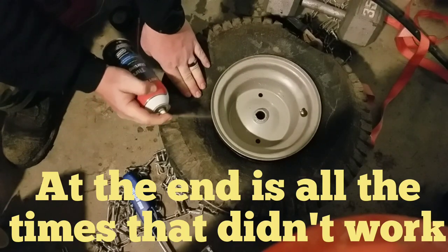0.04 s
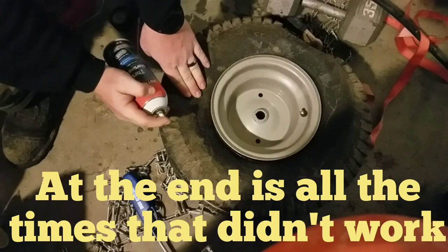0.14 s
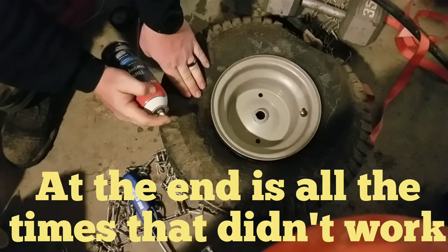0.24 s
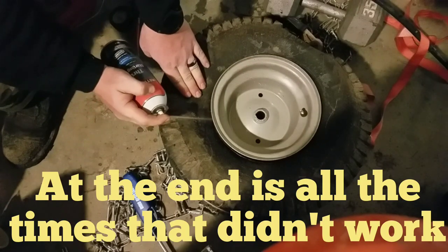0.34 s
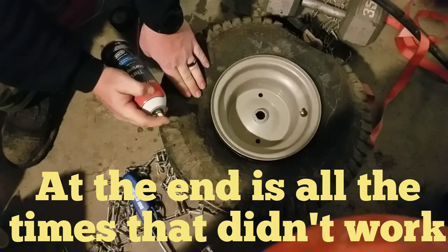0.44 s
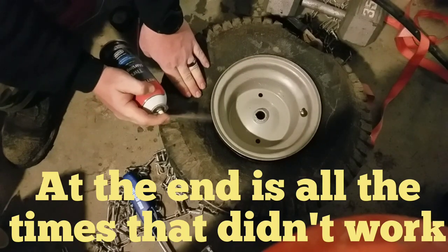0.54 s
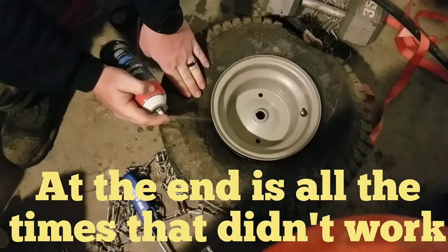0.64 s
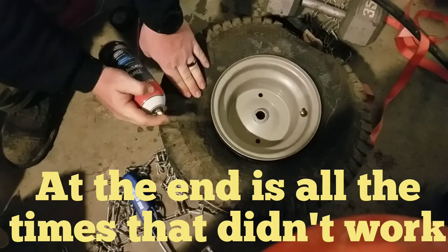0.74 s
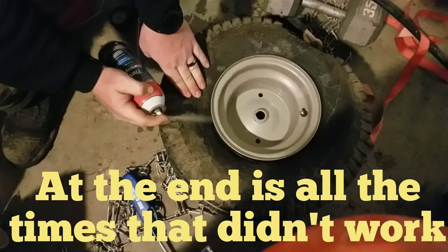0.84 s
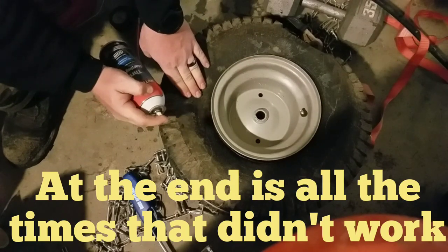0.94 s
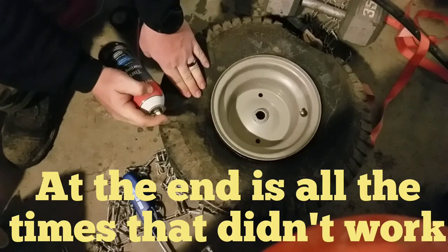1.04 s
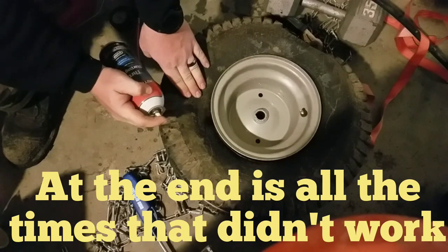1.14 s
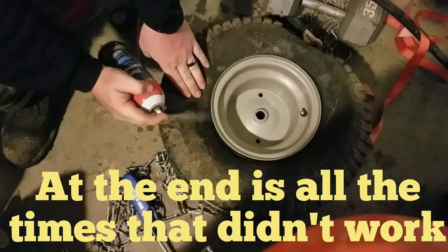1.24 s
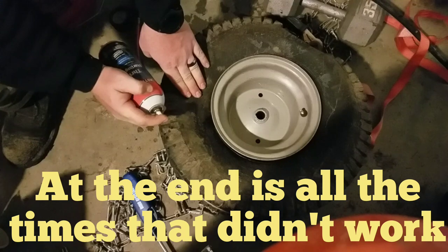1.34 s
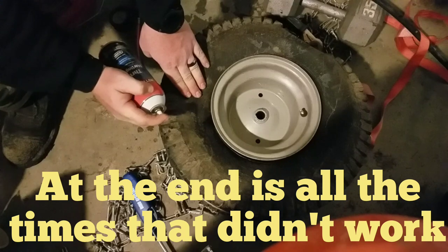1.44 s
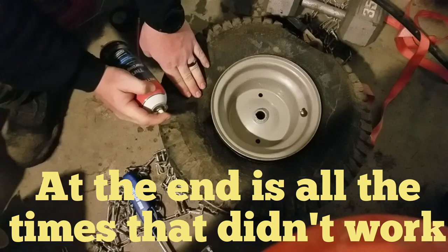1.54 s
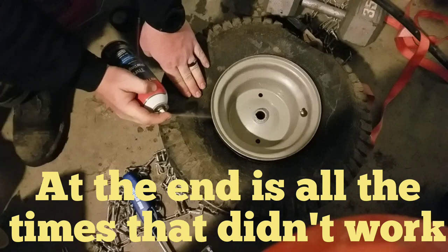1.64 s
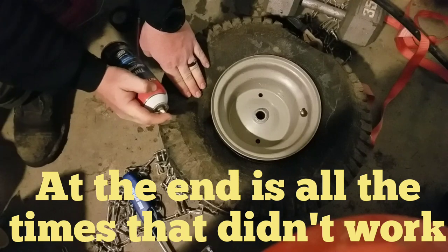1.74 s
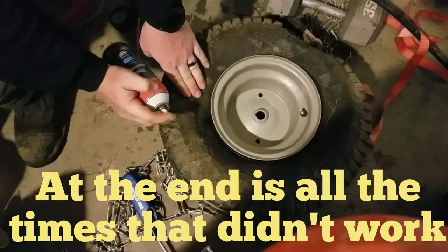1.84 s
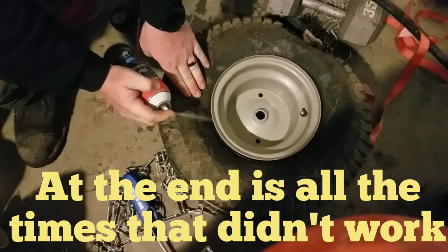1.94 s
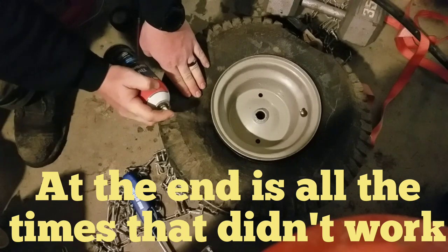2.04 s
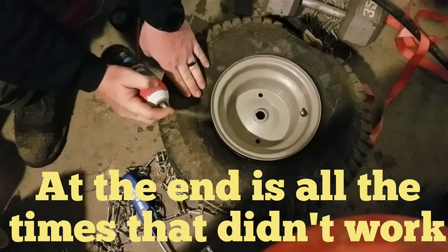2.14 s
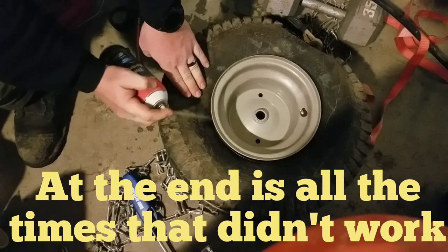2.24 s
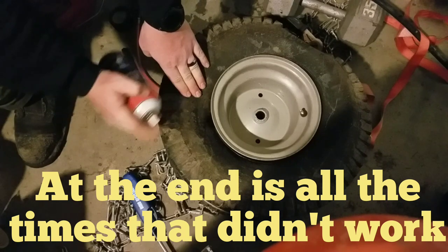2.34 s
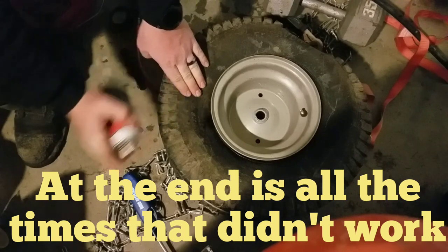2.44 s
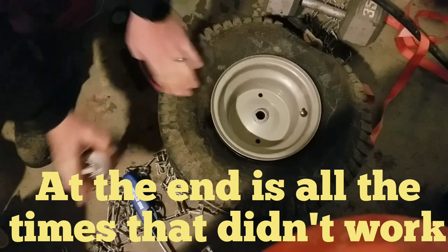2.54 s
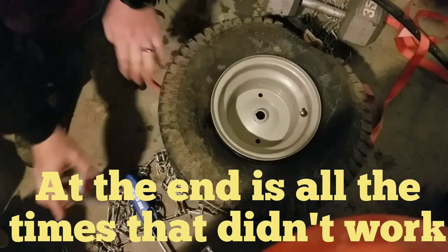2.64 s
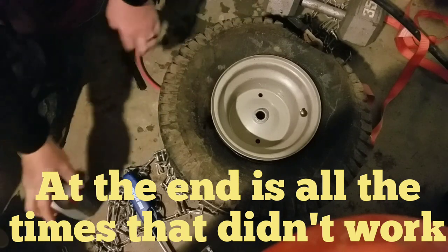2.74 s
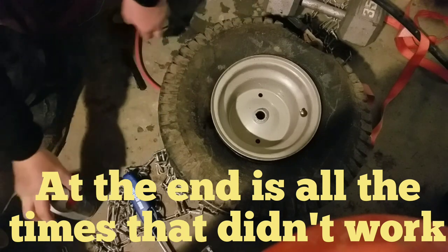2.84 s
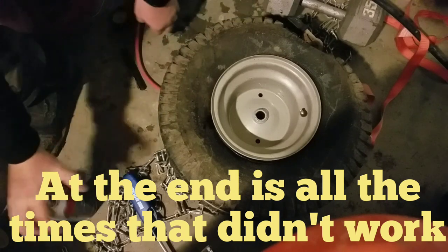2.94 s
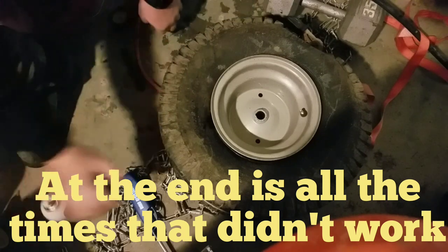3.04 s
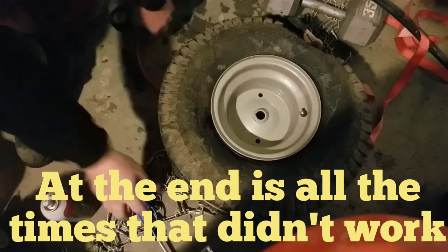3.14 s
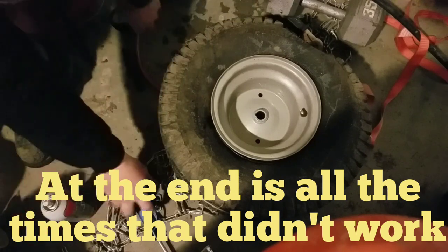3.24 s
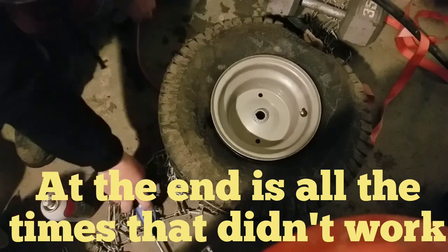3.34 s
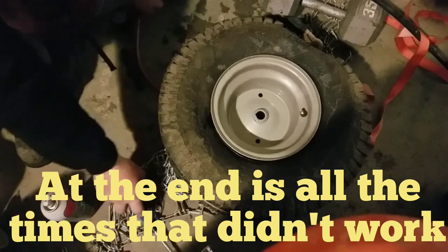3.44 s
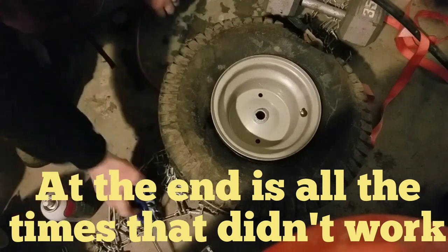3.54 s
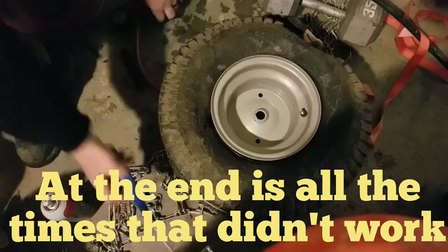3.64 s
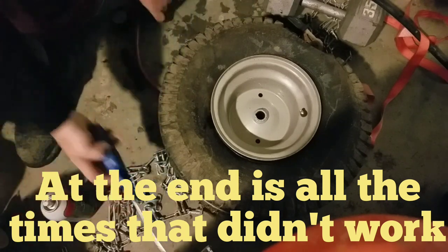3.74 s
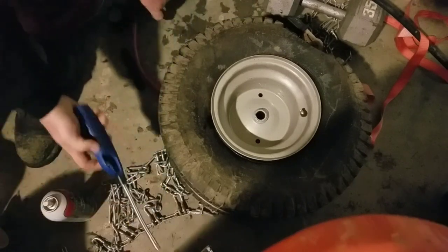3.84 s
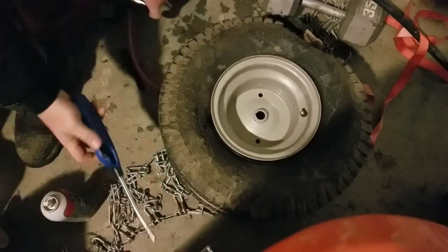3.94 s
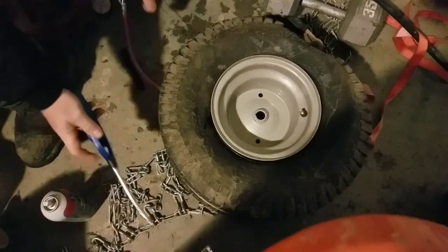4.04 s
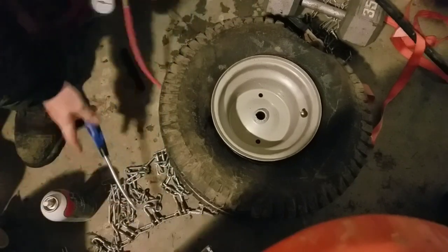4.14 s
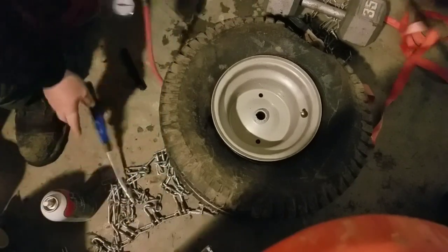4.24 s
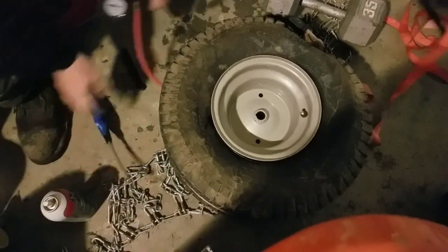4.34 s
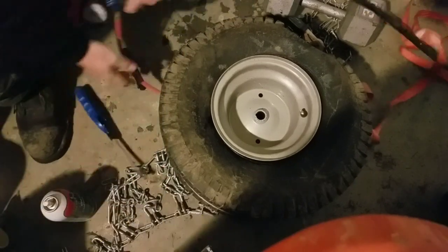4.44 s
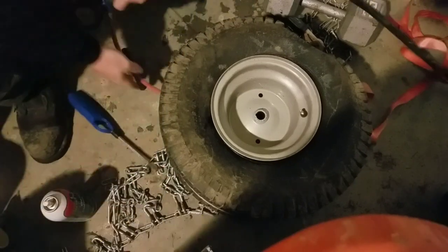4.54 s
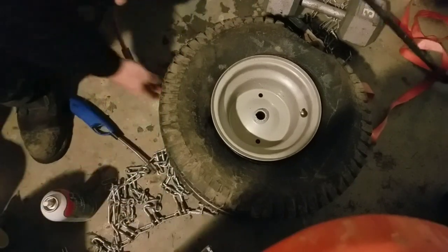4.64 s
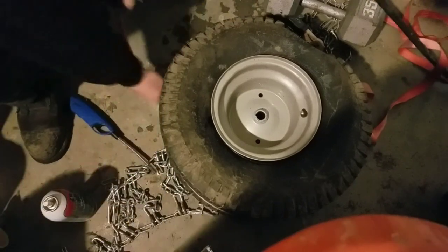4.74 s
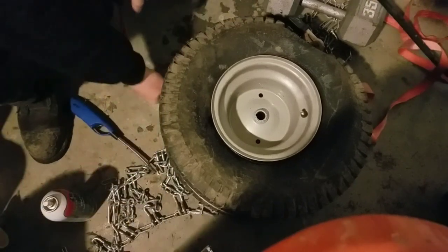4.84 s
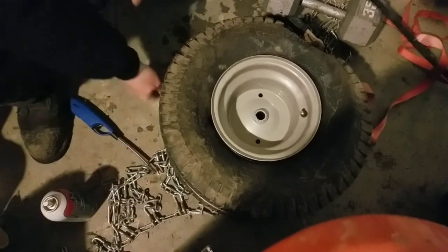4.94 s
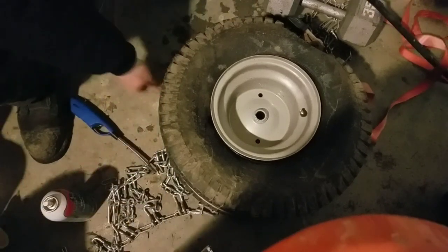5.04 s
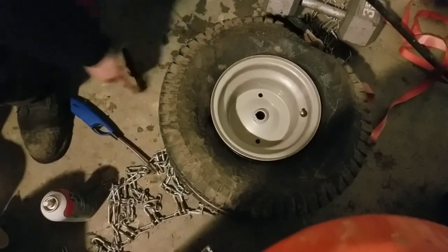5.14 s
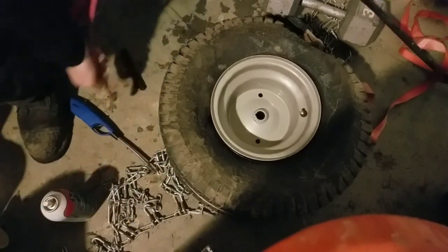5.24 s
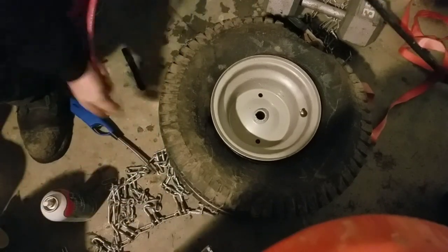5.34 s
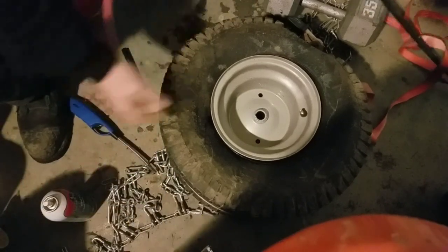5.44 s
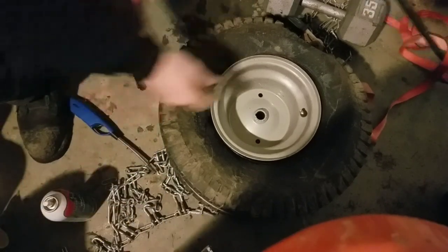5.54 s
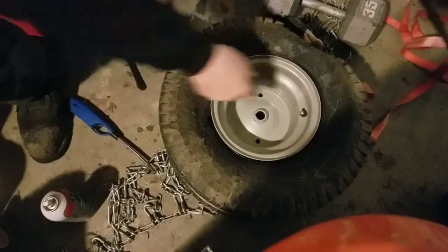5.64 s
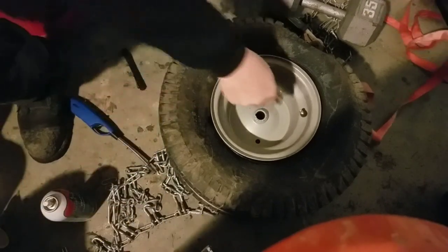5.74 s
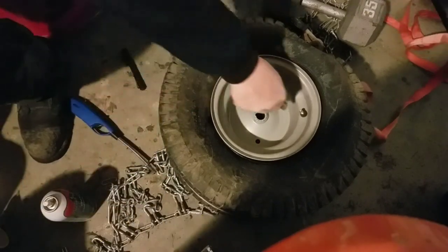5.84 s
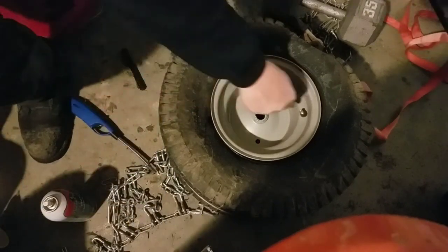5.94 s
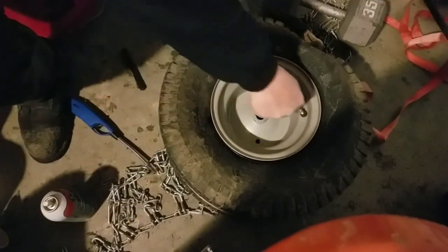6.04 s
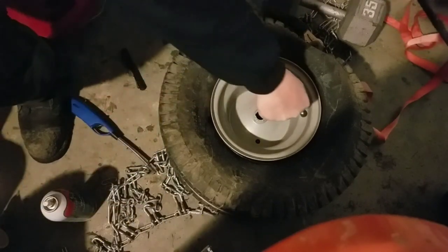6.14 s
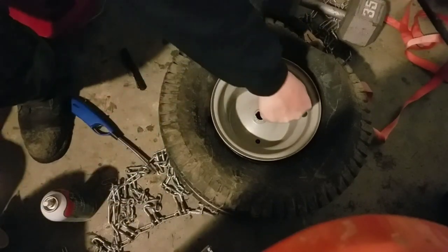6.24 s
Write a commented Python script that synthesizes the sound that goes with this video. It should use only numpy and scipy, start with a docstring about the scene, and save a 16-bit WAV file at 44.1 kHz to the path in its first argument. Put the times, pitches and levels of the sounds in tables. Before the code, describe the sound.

Nine short aerosol bursts hiss into a hollow tire, then the can bangs on concrete and hand tools clatter down in a garage.

```python
"""An aerosol can sprays nine short bursts into the gap between a tire and its rim, on a garage floor:
shaped noise for the jet, resonant noise for the hum of the hollow tire. The can is knocked down on the
concrete and rings (pushes and dying sines); a lighter is picked off a pile of chain, hand tools clatter
down (chattering blows and short modes), and an air hose is dragged over to the rim (grains, dull bumps).
Slipping plastic and rubber squeak (narrow noise); quiet garage air and a low hum lie below."""
import sys
import numpy as np
from scipy import signal
from scipy.fft import rfft, irfft
from scipy.io import wavfile
from scipy.ndimage import uniform_filter1d

SR = 44100
rng = np.random.default_rng(int(sys.argv[2]) if len(sys.argv) > 2 else 0)


def wrap_up_sound(samples):
    """Save the sound to the file named by the first command line argument, as 16-bit audio."""
    columns = np.atleast_2d(samples).T
    # keep every value between -1 and 1, then stretch to whole-number steps
    tamed = np.clip(columns, -1, 1)
    steps = np.round(tamed * 32767).astype(np.int16)
    wavfile.write(sys.argv[1], SR, steps)


N = 278050
TIME = np.arange(N) / SR  # s

# Valve presses: (start [s], length [s], jet level before hiss_db [dB], jet swell over the press [dB],
# roar level before hiss_db-free mix [dB], tire hum level [dB], hum swell over the press [dB])
PRESSES = [(0.099, 0.1491, -38.5, 1, -51.5, -58, -4), (0.411, 0.1336, -39.5, 8.5, -51.5, -50, -1),
           (0.658, 0.1273, -37.5, -2.5, -50, -44.5, -11.5), (0.887, 0.1274, -36, 0.5, -49.5, -43.5, 2),
           (1.114, 0.1294, -36, 1.5, -51, -49, 10.5), (1.338, 0.1328, -37, -5, -50, -48, 3),
           (1.578, 0.2604, -38, 4, -52.5, -48, 2.5), (2.037, 0.1402, -36.5, 3, -50, -46, 2.5),
           (2.277, 0.1326, -36, -1, -50.5, -45, -16)]
# Nozzle fizz spectrum: (frequency [Hz], relative level [dB])
FIZZ_SPECTRUM = [(150, -18.5), (1000, -20.5), (3300, -13), (5200, -17.5), (7500, -11.5), (9800, -12),
                 (10800, -4), (12000, -7.5), (14000, -0.5), (15600, 1.5)]
# Roar spectrum where the jet lands: (frequency [Hz], relative level [dB])
SPLASH_SPECTRUM = [(150, -18), (330, 0.5), (600, 1), (1000, -2.5), (1800, -3), (3300, -3.5), (6000, -12),
                   (15000, -1.5)]
# Rim gap resonances: (frequency before aim shift [Hz], width [Hz], gain [dB])
RIM_GAP_MODES = [(1416, 86, 9.5), (1701, 74, 4.5), (2642, 360, 4), (3040, 170, -12.5), (4218, 143, 3),
                 (6493, 220, 1.5)]
# Air inside the tire: (frequency [Hz], half the width of each of two cascaded resonators [Hz], gain [dB])
TIRE_MODES = [(164.46, 28.9, 4), (187.5, 34.5, -2.5)]
# Liquid spat on the rubber by the first press: (peak time [s], level [dB], rise [s], fade to -60 dB [s])
SPIT_STROKES = [(.137, -48.5, 0.026, 0.3479)]
# Spit spectrum: (frequency [Hz], relative level [dB])
SPIT_SPECTRUM = [(40, -36.5), (120, -6.5), (330, 2.5), (520, -6.5), (750, -6), (1300, -7), (2000, -4.5),
                 (4000, -34), (15000, -44.5)]
VALVE_OPEN_S, VALVE_CLOSE_S, HUM_BUILD_S = 0.007, 0.00834, 0.0107  # ramp, time constant, time constant
SPURT_DB, SPURT_S = 2.5, 0.0129  # stored pressure makes each press start harder
AIM_SHIFT = 0.0407  # each aim meets the gap elsewhere; scales the random shift of its resonances


def spray(hiss_db=3, sputter_db=1.45, roar_follow=0.88, bounce_db=-11, bounce_s=0.00271):
    """The jet starts at once and dies quickly; the air in the tire takes a moment to start humming."""
    hiss = strokes(SPIT_STROKES) * colour(rng.standard_normal(N), SPIT_SPECTRUM)
    hum_gain = np.zeros(N)
    fizz = colour(rng.standard_normal(N), FIZZ_SPECTRUM)
    turbulence = rng.standard_normal(N)
    splash = colour(turbulence, SPLASH_SPECTRUM)
    # uneven liquid in the nozzle
    unevenness = unit(uniform_filter1d(rng.standard_normal(N), size=600))
    sputter = amp(sputter_db * unevenness)
    for start, length, jet_db, swell_db, roar_db, tire_db, tire_swell_db in PRESSES:
        age = np.maximum(TIME - start, 0)
        closing = np.exp(-np.maximum(age - length, 0) / VALVE_CLOSE_S)
        valve = np.minimum(age / VALVE_OPEN_S, 1) * closing
        progress = np.minimum(age / length, 1) - 0.5
        push_db = swell_db * progress + SPURT_DB * np.exp(-age / SPURT_S)
        aim = 1 + AIM_SHIFT * rng.uniform(-1.09, 1)
        gap = sum(amp(db) * resonate(turbulence, hz * aim, width) for hz, width, db in RIM_GAP_MODES)
        roar = amp(roar_db + roar_follow * push_db) * (splash + gap)
        jet = valve * sputter * (amp(hiss_db + jet_db + push_db) * fizz + roar)
        hiss += signal.oaconvolve(jet, scatter(bounce_db, bounce_s))[:N]  # bounces off the rim
        build = 1 - np.exp(-age / HUM_BUILD_S)
        hum_gain += valve * amp(tire_db + tire_swell_db * progress) * build
    hum = unit(sum(amp(db) * resonate_twice(rng.standard_normal(N), hz, 2 * half_width)
                   for hz, half_width, db in TIRE_MODES))
    # steady blowing evens out the swells
    hum = unit(hum / np.sqrt(abs(signal.hilbert(hum)) + 0.355))
    return garage(hiss, wet_db=-8.5) + garage(hum_gain * hum, wet_db=-12.5)


# Can lands on one edge, then the other, and rocks:
# (time [s], level [dB], rasp time constant [s], treble shelf [dB], ring re level [dB])
CAN_LANDINGS = [(2.8995, 2.5, 0.00155, 7, -3), (2.9016, -2, 0.0028, 15.5, -13), (2.9121, -1, .003, 7, -6),
                (3.103, -15.5, 0.0067, 6.5, -17), (3.211, -28.5, 0.0022, -15.5, -18.5)]
# Blow spectrum: (frequency [Hz], relative level [dB])
CAN_BLOW_SPECTRUM = [(40, -53), (130, -22.5), (260, -4), (480, -3), (900, 0), (1300, 0.5), (1700, -6),
                     (2100, -12.5), (2700, -24.5), (3200, -15.5), (3900, -23), (4600, -27), (5800, -26.5),
                     (8000, -25.5), (15000, -27.5)]
# Shell modes: (frequency [Hz], relative level [dB], t60 [s])
CAN_SHELL_MODES = [(418.5, -48.5, 0.32), (486, -35.5, 0.17), (668, -49.5, 0.28), (760.2, -35.5, 0.2),
                   (831.4, -38.5, 0.18), (932.5, -36, .18), (1009.5, -44.5, 0.35), (1144, -37.5, 0.28),
                   (1322, -34.5, 0.2), (1571.5, -42.5, 0.88), (1658, -42.5, .66), (1663, -35.5, 0.23),
                   (3135, -50, 0.3), (4290, -44.5, .15), (4390, -42, 0.25), (4590, -38.5, 0.221),
                   (4744, -46, 0.2), (4730, -53, .14), (5210, -49.5, 0.23)]


def can(thrust_s=0.0001284, rasp_db=-7, slosh_share=0.00998):
    """The can pushes once on the concrete and rasps; its shell rings, detuned by the sloshing liquid."""
    cracks, rings = np.zeros((2, N))
    push = np.exp(-TIME[:SR] / thrust_s)
    push /= np.sum(push)
    for s, db, rasp_s, treble_db, ring_db in CAN_LANDINGS:
        blow = push + amp(rasp_db) * contact(rasp_s)
        add(cracks, s, amp(db) * colour(blow, CAN_BLOW_SPECTRUM, treble_db))
        add(rings, s, amp(db + ring_db) * ring(CAN_SHELL_MODES, slosh_share))
    return garage(cracks, wet_db=-2) + garage(rings, wet_db=-9)


# Lighter, chain and metal tools clack:
# (time [s], nominal peak [dB], pitch of the struck part [Hz], treble shelf before bright_db or dull_db [dB])
CLACK_HITS = [(3.452, -42.5, 2220, -23), (3.516, -43.5, 1960, -32), (3.584, -42.5, 1295, -30.5),
              (3.6484, -37, 2000, -29), (3.9151, -40, 2270, -1), (4.068, -49, 4520, 5.5),
              (4.322, -34.5, 1540, 7.5), (4.370, -24, 1380, -9), (4.391, -29.5, 1660, 0.5),
              (4.4311, -14.5, 1464, -1.5), (4.437, -21, 1357, -15), (4.527, -26.5, 1266, -18),
              (4.596, -25.5, 1485, -10.5), (4.634, -33, 1290, -10), (4.679, -38, 1377, -13),
              (4.769, -37, 1450, -15.5), (4.861, -35, 6930, 12), (5.18, -48.5, 2240, 0)]
# Clack spectrum: (frequency [Hz], relative level [dB])
CLACK_SPECTRUM = [(40, -49), (150, -22), (600, -20), (930, -5), (1100, -9), (1350, 1), (2000, -5.5),
                  (2350, -4.5), (2700, -3), (3400, -2.5), (4400, -6.5), (5300, -8.5), (7000, -6.5),
                  (11000, -8), (15500, -1)]
# Tool modes: (frequency before pitch spread [Hz], relative level [dB], t60 [s])
TOOL_RING_MODES = [(892, -43.5, .08), (1404, -53, 0.2), (1467, -48.5, 0.065), (2523, -46.5, .16)]
TOOL_SPREAD = 0.06  # pitch varies by up to this share either way
HARDEST_CHATTER_S, CHATTER_GROWTH = 0.004, 0.25  # time constant; its power of blow strength


def clacks(part_db=-42, part_t60_s=0.04, peak_s=0.001042, bright_db=1, swarm_db=-3, swarm_s=0.0061,
           dull_db=-7):
    """Each contact cracks, wakes a duller swarm of short modes, and rings the tool and the struck part."""
    cracks, rings = np.zeros((2, N))
    hardest_db = max(row[1] for row in CLACK_HITS)
    for s, db, part_hz, treble_db in CLACK_HITS:
        size = amp(db) * np.sqrt(peak_s * SR)  # peak to energy
        chatter_s = HARDEST_CHATTER_S * amp(db - hardest_db) ** CHATTER_GROWTH
        force = contact(chatter_s, impact=1.2)
        swarm = signal.fftconvolve(force, scatter(20.5, swarm_s))[:SR]
        add(cracks, s, size * colour(force, CLACK_SPECTRUM, treble_db + bright_db))
        add(cracks, s, size * amp(swarm_db) * colour(swarm, CLACK_SPECTRUM, treble_db + dull_db))
        pitch = 1 + TOOL_SPREAD * rng.uniform(-1, 1)
        tool = [(hz * pitch, mode_db, t60) for hz, mode_db, t60 in TOOL_RING_MODES]
        add(rings, s, size * ring(tool + [(part_hz, part_db, part_t60_s)]))
    return garage(cracks, wet_db=-7.5) + garage(rings, wet_db=-11)


# Soft bumps of hands, boots and hose, and a dull thud of the can rocking at 3.21 s: # (time [s], energy level
# [dB], centre frequency [Hz])
SOFT_BUMPS = [(3.209, -22, 364.5), (3.914, -20, 574), (4.175, -35.5, 777), (4.324, -20.5, 166.5),
              (4.575, -22, 354.8), (4.62, -19, 98.4), (4.629, -16.5, 338.6), (4.970, -13, 172.5),
              (4.973, -24.5, 984), (5.006, -16, 196.4), (5.06, -17, 139), (5.1453, -28, 1006),
              (5.147, -13, 147.2), (5.971, -14, 308), (6.005, -21.5, 329)]
BUMP_CYCLES = 1.6  # chatter time constant in cycles: a softer blow is both lower and longer


def bumps(breadth=0.6):
    """Soft blows: a dull push with no lasting ring."""
    out = np.zeros(N)
    for s, db, hz in SOFT_BUMPS:
        push = resonate_twice(contact(BUMP_CYCLES / hz), hz, breadth * hz)
        add(out, s, amp(db) * push / np.linalg.norm(push))
    return out


# Things slide over chain and concrete:
# (peak time [s], level [dB], rise [s], fade to -60 dB [s], treble shelf [dB])
SCRAPE_STROKES = [(3.452, -50, 0.0257, 0.22, -3.5), (3.575, -53, 0.077, 0.2551, -5.5),
                  (3.635, -59, 0.017, 0.5139, -8), (3.975, -51, 0.034, 0.0073, 10),
                  (4.36, -54.5, 0.033, 0.23, 7.5), (4.44, -40, 0.0053, .5, 4.5),
                  (4.635, -50.5, 0.041, 0.2225, -8.5), (4.76, -55, 0.031, 0.2153, -6),
                  (4.975, -58, 0.0066, 0.43, 2.5), (5.15, -63, 0.0075, 0.2, 1.5)]
# Scrape spectrum: (frequency [Hz], relative level [dB])
SCRAPE_SPECTRUM = [(40, -36), (200, -3), (700, -7.5), (1300, -8.5), (2100, 0), (3100, -6), (4800, -17),
                   (9000, -22), (15000, -15.5)]


def scrapes():
    """Gritty sliding: dense uneven clicks, smeared by a swarm of modes."""
    grit = unit(signal.oaconvolve(grains(1800, 3.86), scatter(-1.0, 0.0069))[:N])
    out = np.zeros(N)
    for *stroke, treble_db in SCRAPE_STROKES:
        out += strokes([stroke]) * colour(grit, SCRAPE_SPECTRUM, treble_db)
    return out


# Sleeve and hose rub over the tire:
# (peak time [s], level before rub_db [dB], rise [s], fade to -60 dB [s])
RUB_STROKES = [(5.896, -50, 0.02204, .12), (5.945, -45, 0.0071, 0.05), (5.976, -41.5, .02, 0.31)]
# Rub spectrum: (frequency [Hz], relative level [dB])
RUB_SPECTRUM = [(35, -28.5), (110, -1.5), (330, -3), (520, -9.5), (720, -8.5), (1100, -10.5), (1900, -18),
                (3000, -24), (5000, -34), (9000, -36.5), (15500, -33)]


def rubs(rub_db=-1):
    """Rubbing cloth and hose: dull, dense grains under swelling strokes."""
    return amp(rub_db) * strokes(RUB_STROKES) * colour(grains(1500, 2.57), RUB_SPECTRUM)


# Chain links struck: (time [s], level [dB])
LINK_HITS = [(3.453, -37), (3.524, -41.5)]
# Link modes: (frequency [Hz], relative level [dB], t60 [s])
LINK_RING_MODES = [(10720, -16, 0.095), (10990, -11.5, 0.13), (12000, -22, 0.14), (12270, -20, 0.2)]


def chain():
    """Chain links ring thin and high, wavering slightly in pitch."""
    out = np.zeros(N)
    for s, db in LINK_HITS:
        add(out, s, amp(db) * ring(LINK_RING_MODES, waver=0.00234))
    return out


# Plastic and rubber slip: (time [s], level [dB], frequency [Hz], length [s])
SLIPS = [(2.424, -62, 2405, 0.031), (3.571, -58, 1415, 0.0222), (3.609, -57, 1952, .035),
         (3.945, -63, 2243, 0.019), (5.169, -62.5, 2257, 0.0217)]


def squeaks(width_hz=260):
    """A short slip excites one narrow resonance."""
    out = np.zeros(N)
    for s, db, hz, length in SLIPS:
        tone = resonate_twice(rng.standard_normal(SR // 4), hz, width_hz)
        tone = tone[-round(length * SR):]  # settled end
        add(out, s, amp(db) * unit(tone * np.hanning(len(tone))))
    return out


# Quiet garage air spectrum: (frequency [Hz], relative level [dB])
AIR_SPECTRUM = [(15, -28.5), (28, -10), (50, -3.5), (78, -2), (125, -8), (250, -14), (500, -16),
                (1000, -21), (2000, -27), (3200, -30.5), (5000, -37.5), (10000, -40.5), (13000, -37),
                (15500, -33)]
# Air level with faint clothing rustle: (time [s], level [dB])
AIR_LEVEL = [(0, -65), (2.4, -61), (2.8, -64), (3.4, -59.5), (3.8, -63), (4.3, -56), (5.6, -61.5),
             (6.3, -66.5)]


def air(hum_hz=66.2, resonator_width_hz=28, hum_db=-65.5):
    """Soft room noise over a low, wavering hum of narrow-band noise."""
    hum = unit(resonate_twice(rng.standard_normal(N), hum_hz, resonator_width_hz))
    return level(AIR_LEVEL) * colour(rng.standard_normal(N), AIR_SPECTRUM) + amp(hum_db) * hum


# Diffuse tail: (frequency [Hz], t60 [s])
GARAGE_T60 = [(100, .4), (400, 0.289), (1500, 0.311), (4000, 0.361), (9000, 0.2305), (15000, 0.18)]
# Single echoes: (delay [s], gain re direct [ratio])
GARAGE_ECHOES = [(.0026, 0.23), (0.0111, 0.31), (0.0199, 0.26), (.0215, .18), (0.0226, 0.2)]


def garage(x, wet_db):
    """Direct sound, single echoes from floor and walls, and a diffuse tail that dies sooner in the treble."""
    hz, t, z = signal.stft(rng.standard_normal(SR), SR, nperseg=256)
    decay = amp(-60 * t / read(GARAGE_T60, hz)[:, None])
    tail = signal.istft(z * decay, SR, nperseg=256)[1][:SR]
    tail *= np.minimum(TIME[:SR] / 0.0054, 1)  # onset ramp, s
    response = amp(wet_db) * tail / np.linalg.norm(tail)
    response[0] += 1
    for delay, gain in GARAGE_ECHOES:
        response[round(delay * SR)] += gain
    return signal.fftconvolve(x, response / np.linalg.norm(response))[:N]


def amp(db):
    """Decibels to gain."""
    return 10 ** (np.asarray(db) / 20)


def unit(x):
    """Scales to rms 1."""
    return x / np.sqrt(np.mean(x ** 2) + 1e-20)


def read(points, hz):
    """Reads a table on a log-frequency axis."""
    f, value = np.transpose(points)
    return np.interp(np.log(hz + 1), np.log(f + 1), value)


def level(rows):
    """Gain over time from (time [s], level [dB]) rows."""
    return amp(np.interp(TIME, *np.transpose(rows)))


def strokes(rows):
    """Gain over time of strokes that swell to a peak and die away."""
    gain = np.zeros(N)
    for s, db, rise, fade in rows:
        swell = np.clip(1 + (TIME - s) / rise, 0, 1)
        gain += amp(db - 60 * np.maximum(TIME - s, 0) / fade) * swell
    return gain


def add(mix, s, sound):
    """Mixes a sound in at time s."""
    part = mix[round(s * SR):][:len(sound)]
    part += sound[:len(part)]


def colour(x, points, treble_db=0, size=4096):
    """Causal minimum-phase filter of unit energy with the given spectrum and a treble shelf."""
    hz = np.fft.rfftfreq(size, 1 / SR)
    shelf_db = treble_db * hz ** 2 / (hz ** 2 + 3500 ** 2)
    cepstrum = irfft(np.log(amp(read(points, hz) + shelf_db)))
    # fold to the causal side
    cepstrum[1:size // 2] *= 2
    cepstrum[size // 2 + 1:] = 0
    taps = irfft(np.exp(rfft(cepstrum)))
    return signal.fftconvolve(x, taps / np.linalg.norm(taps))[:len(x)]


def resonate(x, hz, width_hz):
    """One resonance of peak gain 1."""
    return signal.lfilter(*signal.iirpeak(hz, hz / width_hz, SR), x)


def resonate_twice(x, hz, width_hz):
    """Two equal resonators in cascade, for steeper skirts."""
    return resonate(resonate(x, hz, width_hz), hz, width_hz)


def ring(modes, waver=0.0, waver_hz=11):
    """Dying sines of a struck object; each may waver in pitch by a small share."""
    t = TIME[:SR]
    out = np.zeros(SR)
    for hz, db, t60 in modes:
        detune = waver * np.sin(2 * np.pi * (waver_hz * t + rng.random()))
        phase = 2 * np.pi * np.cumsum(hz * (1 + detune)) / SR
        out += amp(db - 60 * t / t60) * np.sin(phase)
    return out


def contact(decay_s, impact=0.77):
    """A blow of unit energy: one clean impact plus dying chatter."""
    force = rng.standard_normal(SR) * np.exp(-TIME[:SR] / decay_s)
    force[0] += impact
    return force / np.linalg.norm(force)


def grains(per_s, spread_db):
    """Random tiny clicks of uneven size, rms 1."""
    size = amp(spread_db * np.minimum(rng.exponential(1, N), 4))
    return unit(size * rng.standard_normal(N) * (rng.random(N) < per_s / SR))


def scatter(swarm_db, decay_s):
    """A direct click plus a dense, dying swarm of reflections or modes."""
    t = TIME[:SR // 4]
    swarm = rng.standard_normal(len(t)) * np.exp(-t / decay_s)
    swarm *= amp(swarm_db) / np.linalg.norm(swarm)
    swarm[0] += 1
    return swarm / np.linalg.norm(swarm)


def scene():
    """All sources reach one microphone."""
    handling = bumps() + scrapes() + rubs() + chain() + squeaks()
    mono = spray() + can() + clacks() + garage(handling, wet_db=-7) + air()
    return np.array([mono, mono])


def record(dry, low_hz=38, edge_hz=15850):
    """The microphone's bass roll-off and the recorder's band limit."""
    thin = signal.sosfilt(signal.butter(2, low_hz, "high", fs=SR, output="sos"), dry)
    band_limit = signal.firwin(511, edge_hz, window=("kaiser", 9), fs=SR)
    return signal.oaconvolve(thin, band_limit[None], "same")


dry = scene()
out = record(dry)
wrap_up_sound(out)
```